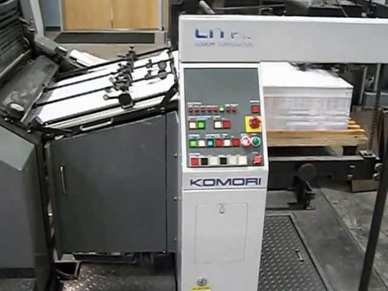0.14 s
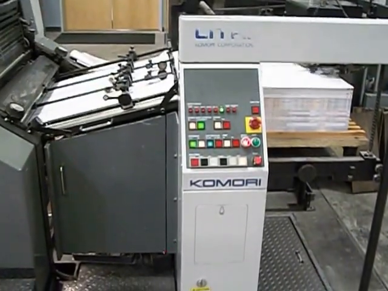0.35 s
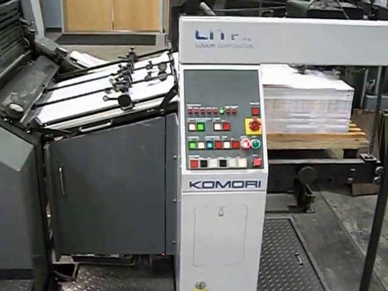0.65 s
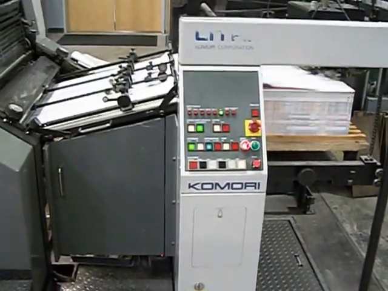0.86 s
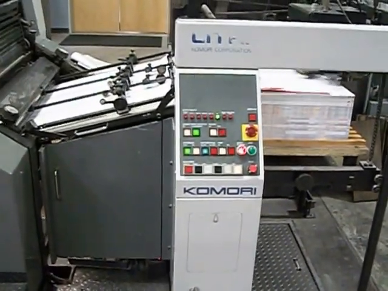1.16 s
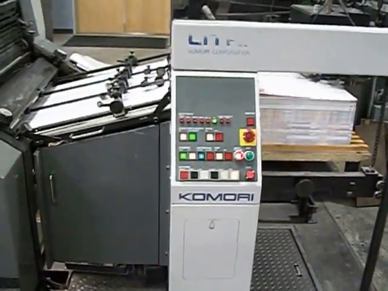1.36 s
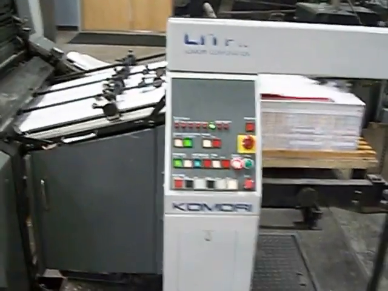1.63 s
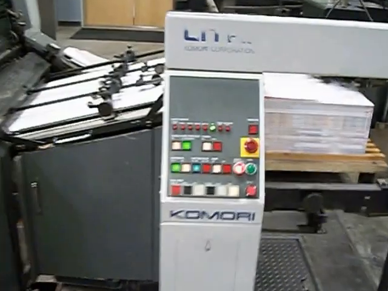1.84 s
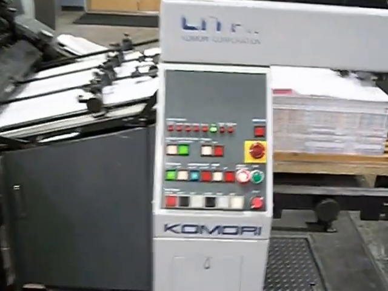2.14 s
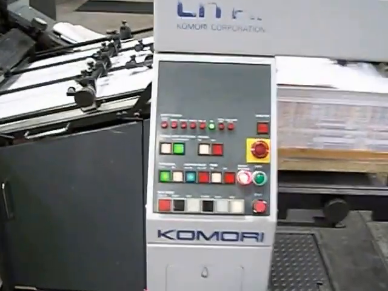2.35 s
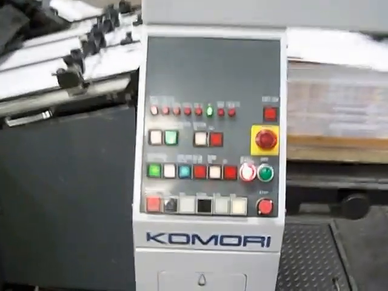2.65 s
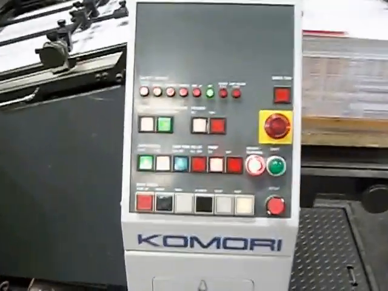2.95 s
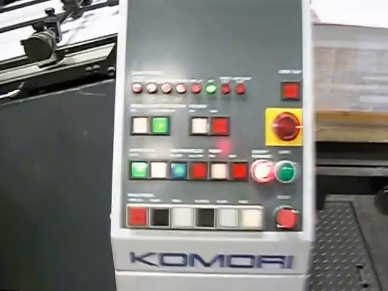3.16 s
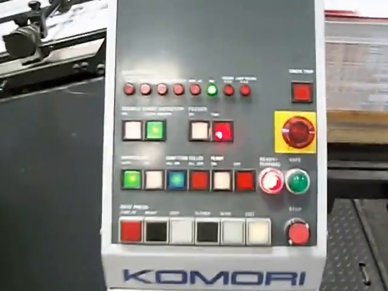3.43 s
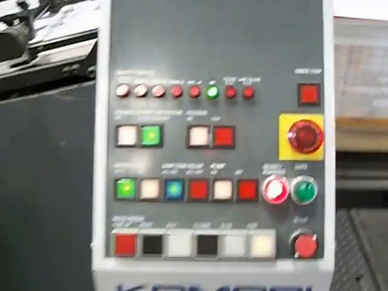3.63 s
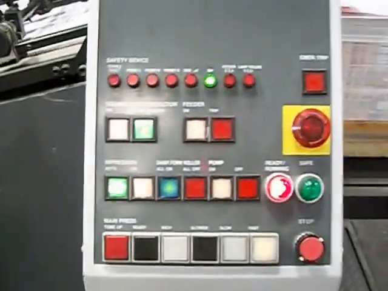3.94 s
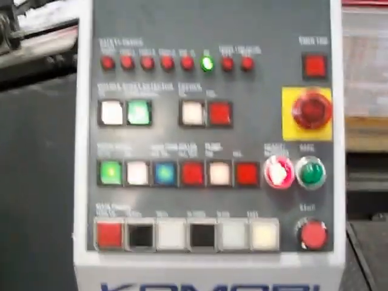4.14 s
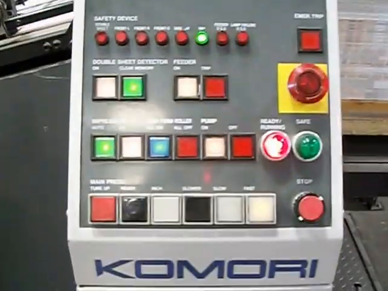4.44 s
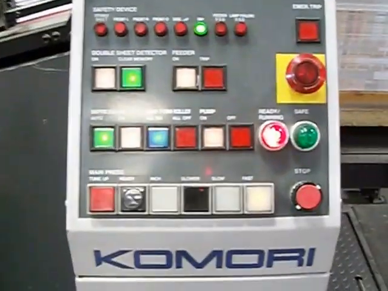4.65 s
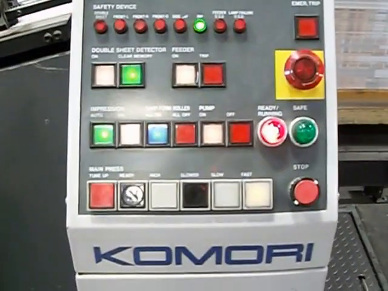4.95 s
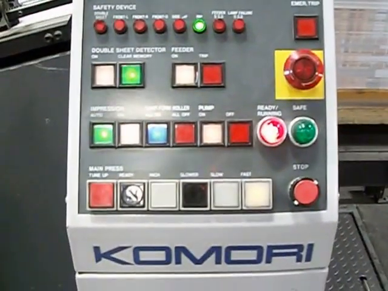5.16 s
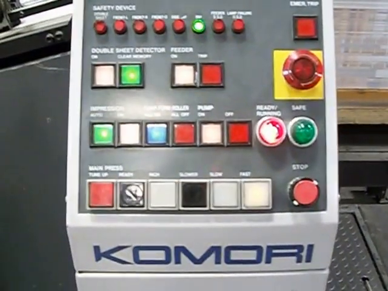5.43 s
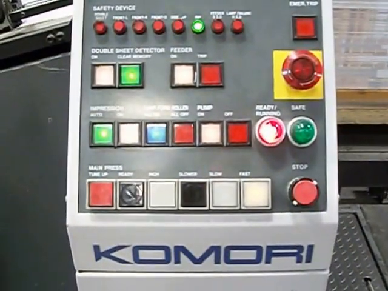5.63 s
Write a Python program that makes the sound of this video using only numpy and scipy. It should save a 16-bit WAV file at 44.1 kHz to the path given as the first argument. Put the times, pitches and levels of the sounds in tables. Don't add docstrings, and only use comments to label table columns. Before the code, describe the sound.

A sheet-fed printing press runs steadily with a low roar, thin motor whine, air hiss and rhythmic knocks and clacks.

```python
import sys
import numpy as np
from scipy import signal
from scipy.fft import rfft, irfft, next_fast_len
from scipy.io import wavfile
from scipy.ndimage import uniform_filter1d

SR = 44100
rng = np.random.default_rng(int(sys.argv[2]) if len(sys.argv) > 2 else 0)


def wav_record(signal):
    frames = np.transpose(np.atleast_2d(signal))
    bounded = np.clip(frames, -1, 1)
    quanta = np.round(bounded * 32767).astype(np.int16)
    wavfile.write(sys.argv[1], SR, quanta)


def boost(x):
    u = np.asarray(x, float) / 20
    return 10 ** u


N = 255339
TIME = np.arange(N) / SR

# [t/s, nearness 0-1]
WALK = [(0, .05), (.5, .25), (1.0, .1), (1.6, .05), (1.9, .4), (2.4, .3), (2.6, .7), (3.0, .65),
        (3.4, 1.05), (3.7, .95), (4.8, .8), (5.35, 1.1), (5.6, .85), (5.79, .9)]

SHAFT_HZ, MESH_HZ, IDLER_HZ = 58.21, 123.15, 619
SHAFT_DB, SHAFT_NEAR_DB, MESH_DB, MESH_NEAR_DB = -35.5, 2.2, -40, 8
BEAT_HZ, BEAT_PEAK_S, BEAT_DB = 1.53, .7, 1.6
SECOND_NEAR_DB, PUMP_NEAR_DB = 6.5, -8
FLUTTER_DB_PER_KHZ, FLUTTER_HZ = .6, 9
SWAY_RAD_PER_KHZ = .3
# [multiple, level/dB]
SHAFT_PARTIALS = [(2, -43), (4, -45), (5, -46), (42, -58.5), (56, -57), (76, 0), (96, -61)]
# [multiple, level/dB]
MESH_PARTIALS = [(8, -48), (22, -59)]
# [f/Hz, level/dB]
PUMPS = [(360, -45), (949.5, -50), (2766.7, -57), (5375.6, -54.5), (401, -50), (697, -50), (2650, -60),
         (2988, -60), (5169, -62)]
# [t/s, fan/dB, lower slot/dB, upper slot/dB]
NODES = [(0, -41, -52, -41), (.21, -35, -53, -42), (.62, -39, -52, -40), (.78, -40, -52, -47),
         (1.05, -40, -56, -45), (1.3, -43, -56, -59), (1.7, -47, -51, -48), (2.0, -46, -46.5, -50),
         (2.36, -40, -46, -53), (2.6, -50, -49, -47), (3.0, -50, -51, -50), (3.25, -41, -55, -49),
         (3.65, -46, -51, -50), (3.86, -47, -41.5, -51), (4.2, -52, -45, -50), (4.6, -48, -43.5, -49),
         (5.3, -49, -43, -50), (5.79, -46, -43, -51)]
# [t/s, gear whine/dB, middle slot/dB, top slot/dB, idler/dB]
SIDE_NODES = [(0, -46, -54, -60, -52), (.5, -51, -63, -58, -50), (1.3, -50, -60, -62, -47),
              (1.65, -53, -62, -60, -54), (1.95, -58, -52, -54, -50), (2.35, -50, -60, -50, -43),
              (2.6, -51, -57, -63, -49), (2.85, -60, -58, -58, -38), (3.15, -50, -54, -60, -40),
              (3.5, -51, -58, -52, -45), (3.9, -52, -51, -53, -51), (4.3, -52, -53, -51, -53),
              (4.65, -54, -54, -56, -48), (4.95, -54, -48, -56, -50), (5.79, -55, -53, -55, -54)]
# [t/s, level/dB]
TOP_SLOT = [(0, -63), (1.1, -59.5), (1.35, -50), (1.6, -58), (1.85, -47.5), (2.1, -51), (2.4, -55),
            (2.8, -52), (3.3, -55.5), (5.79, -58)]
HIGHEST_SLOT = 76

# [f/Hz, density/dB per Hz]
RUMBLE = [(25, -11), (42, -7.5), (72, -6), (98, -0.5), (420, 0.5), (600, -2), (750, -2.5), (950, -42.5)]
# [f/Hz, density/dB per Hz]
ROLLERS = [(550, -22.5), (750, -3.5), (870, -1.5), (1000, -1.5), (1120, -6.5), (1300, -11), (1500, -16),
           (1900, -41)]
# [f/Hz, density/dB per Hz]
CHAIN = [(1100, -9.5), (1450, -6), (1750, -0.5), (2600, -1), (3000, 0.4), (3500, -4), (3900, -6),
         (4500, -36)]
# [f/Hz, density/dB per Hz]
AIR = [(3400, -8.5), (3950, -4.5), (4300, -0.5), (4750, 1.5), (5100, 2.5), (5450, -8.5), (5900, -36.5)]
# [f/Hz, density/dB per Hz]
BLOWER = [(5150, -14), (5350, -2.5), (5620, 4.5), (5720, -6.5), (5790, -12), (6000, -8.5)]
RUMBLE_DB, ROLLER_DB, CHAIN_DB = (-29, 2, -1), (-34, 0.5, 0), (-42, .5, 1.5)
AIR_DB, BLOWER_DB = (-43.5, 0, 2), (-54.5, -0.2, 3)
BLOWER_FIRST_S, BLOWER_TURN_S = .47, .941
# [delay/s, width/s, swell/dB]
STROKES = [
    (0, .05, 7),
    (.345, .045, 4.5),
]

WHISTLE_DB, REED_DB = -51.5, -57
# [t/s, f/Hz]
WHISTLE = [(0, 5075), (.24, 5088), (.47, 5010), (.65, 5065), (.9, 5030), (1.3, 5090), (1.48, 5018),
           (1.65, 5025), (1.84, 5110), (2.0, 5030), (2.17, 5098), (2.4, 5030), (2.85, 5100), (2.98, 5005),
           (3.25, 5055), (3.42, 5015), (3.6, 5055), (3.95, 5090), (4.2, 5055), (4.43, 5005), (4.78, 5095),
           (5.0, 5030), (5.2, 5060), (5.33, 5025), (5.5, 5058), (5.68, 5030), (5.79, 5045)]
# [t/s, f/Hz]
REED = [(0, 5580), (.8, 5570), (.95, 5600), (1.25, 5595), (1.45, 5575), (1.9, 5600), (2.6, 5600),
        (2.95, 5570), (3.4, 5600), (3.7, 5610), (5.2, 5600), (5.79, 5575)]
# [centre t/s, half length/s, level over faint/dB]
SPELLS = [(.24, 0.17, 4.5), (.55, .04, 5), (1.31, 0.033, 7), (1.55, 0.068, 7), (1.8, .06, 4),
          (2.128, 0.048, 7), (2.54, 0.059, 4.5), (2.8, 0.064, 4), (3.07, .06, 8), (3.42, 0.025, 6),
          (3.58, 0.06, 9), (3.8, .06, 4), (4.041, 0.065, 7.5), (4.21, .04, 10), (4.47, .08, 7.5),
          (5.21, 0.051, 8.5), (5.46, .1, 6), (5.708, 0.077, 5)]
SPELL_EDGE_S = 0.0095

FIRST_SHEET_S, SHEET_S = .116, .4432
BUSY_AT_S, BUSY_S = 0.027, 0.052
# [delay/s, thud/dB, crack/dB, clack/dB, body/dB, tick/dB, puff/dB]
CAMS = [
    (0.0005, -0.5, -17.5, -19, -32, -25.5, -22.5),
    (0.017, 9, -9.5, 0, -0.5, -16, -14),
    (.0535, 11, 1, -6, -8, -20.5, 4.5),
    (0.128, 14, -5, 3.5, 8.5, -9.5, -18),
    (0.2509, -19.5, -16.5, -18.5, -14.5, 3.5, -3),
]
# [grippers/dB, side lay/dB, sucker lift/dB, stop/dB, sucker release/dB]
SHEETS = [(-11.5, -33.5, -32.5, -32, -44), (-21, -32, -38, -33.5, -53.5), (-13.5, -31.5, -31, -34.5, -36.5),
          (-19, -26.5, -36.5, -33, -38), (-17.5, -28.5, -35.5, -34.5, -33.5),
          (-13.5, -35.5, -30.5, -30.5, -25.5), (-20.5, -30.5, -31.5, -35.5, -37),
          (-8.5, -34.5, -33.5, -31.5, -38.5), (-8, -36.5, -32, -29.5, -27.5), (-20.5, -24, -28, -28.5, -38),
          (-13, -26.5, -29, -30, -29.5), (-13, -23, -30, -28.5, -35), (-12.5, -23.5, -29.5, -32, -36)]
# [t/s, thud/dB,
# clack/dB, tick/dB]
STRAYS = [(0.7727, -35, -30, -55), (1.8667, -34, -47, -47), (1.952, -40.5, -33, -34.5),
          (2.738, -40, -35.5, -40.5), (3.1958, -46.5, -43.5, -32), (3.3019, -41.5, -42.5, -33),
          (1.0052, -26, -42.5, -52.5), (3.562, -26.5, -46, -50.5), (3.5764, -46.5, -30.5, -39.5),
          (3.45, -39.5, -47, -32), (3.808, -41.5, -55, -34), (3.913, -29.5, -38, -53.5),
          (4.0783, -38, -28, -56.5), (4.3416, -33, -43, -30.5), (4.608, -12.5, -46.5, -56),
          (4.9724, -40, -32.5, -31), (5.305, -38, -40.5, -56), (5.3905, -40.5, -29.5, -46),
          (5.5095, -41, -45.5, -32.5), (1.0172, -38, -35, -34), (1.060, -50.5, -41.5, -39),
          (2.3249, -51, -42.5, -28.5), (3.135, -48, -47, -40.5), (4.1564, -47, -40.5, -31),
          (4.3553, -49.5, -43.5, -36), (5.0626, -44, -51.5, -31), (5.1214, -29.5, -25, -47.5),
          (5.4374, -48, -26.5, -38.5), (5.4895, -42, -49.5, -40), (1.8888, -28.5, -31.5, -57.5),
          (5.451, -39, -27, -32.5)]
STRAY_BODY_DB, STRAY_CRACK_DB, STRAY_PUFF_DB = -5, -18.5, -5
# [f/Hz, level/dB, t60/s]
KNOCK_MODES = [(473, -5, 0.12), (674, -3, 0.0081), (736, -14.5, 0.025), (940, 2, 0.018), (1270, -12.5, 0.1)]
CLACK_HZ, TICK_HZ, RING_SPREAD = 2950, 4620, .015
CRACK_T60_S, PUFF_T60_S, PUFF_RISE_S = .03, .07, .009
PLATE_HZ, PLATE_T60_S, PLATE_DB = 2655, 0.097, -8.5
# [t/s, level/dB, f/Hz]
TICKS = [(0.173, -32.5, 4840), (0.6125, -31, 4770), (1.0585, -32, 4790), (1.94, -35, 4430),
         (2.3314, -34.5, 3700), (2.7916, -34, 4500), (3.2191, -30.5, 5000), (3.3484, -31.5, 4820),
         (3.5768, -30.5, 3600), (3.8102, -34.5, 4650), (3.9125, -38, 4470), (4.1046, -32.5, 4600),
         (4.5491, -31.5, 4230), (4.6054, -31, 4570), (4.791, -32.5, 4830), (4.9931, -31.5, 4400),
         (5.0054, -30.5, 5010), (5.2324, -34.5, 4300), (5.436, -29.5, 4410), (5.4824, -31, 4520)]
# [t/s, level/dB, f/Hz]
BRIGHT_CLICKS = [(0.129, -37, 3380), (0.175, -35, 4620), (.243, -40, 3350), (1.131, -35.5, 3500),
                 (3.132, -33.5, 3680), (3.240, -33.5, 2726), (3.349, -35.5, 3400), (3.662, -33, 2880),
                 (3.787, -31.5, 3300), (3.912, -31.5, 3340), (4.156, -33, 4690), (4.231, -34, 3310),
                 (4.677, -37, 3330)]
TICK_GAIN_DB, TICK_T60_S, TICK_RISE_S = 11.5, 0.027, 0.0044
# [t/s, level/dB, f/Hz]
KNOCKS = [(1.0055, -12, 800), (1.0222, -16, 600), (2.208, -16, 600), (2.7395, -15, 600), (3.5625, -13, 800),
          (3.6617, -4, 780), (3.669, -14, 720), (4.117, -15, 600), (4.961, -15, 550)]
KNOCK_T60_S, KNOCK_RISE_S = .013, .0008
# [t/s, level/dB, f/Hz]
BOOMS = [(2.18, -17.5, 184), (2.83, -18, 192), (3.42, -16, 185), (4.10, -19.5, 200), (4.27, -21.5, 197.5),
         (4.32, -18, 205), (4.569, -19.5, 189.6), (4.781, -15.5, 191), (5.40, -19, 180), (5.48, -26, 175),
         (5.64, -18, 199)]
BOOM_T60_S, BOOM_RISE_S = 0.19, 0.028
HALL_T60_S, HALL_DB = .3, -10

MIC_RATE_HZ, LEFT_LAG_S = 12000, 1 / 12000
# [f/Hz, level/dB]
MIRROR = [(6000, 0), (6300, -5), (6600, -11.5), (7000, -20.5), (7500, -36), (7600, -43), (7700, -58),
          (7800, -120)]


def curves(table):
    s, *columns = np.transpose(table)
    return [np.interp(TIME, s, c) for c in columns]


def drift(rate_hz):
    k = int(SR / 64 / rate_hz)
    held = np.repeat(rng.standard_normal(N // 400)[:N // 64 // k + 2], k)
    coarse = uniform_filter1d(uniform_filter1d(held, k), k)
    return 1.44 * np.interp(TIME, np.arange(len(coarse)) * 64 / SR, coarse)


def bed(far_db, near_db, busy_db):
    since = (TIME - FIRST_SHEET_S - BUSY_AT_S + SHEET_S / 2) % SHEET_S - SHEET_S / 2
    return far_db + near_db * curves(WALK)[0] + busy_db * np.exp(-.5 * (since / BUSY_S) ** 2)


def tone(hz, db, wander_db, wobble):
    phase = 2 * np.pi * (np.cumsum(hz + 0 * TIME) / SR + rng.random())
    phase = phase + hz / 1000 * (wobble * drift(6) + SWAY_RAD_PER_KHZ * drift(1.5))
    wander = wander_db * drift(2.965)
    flutter = FLUTTER_DB_PER_KHZ * np.minimum(hz / 1000, 3) * np.minimum(drift(FLUTTER_HZ), .4)
    return np.sqrt(2) * boost(db + wander + flutter) * np.sin(phase)


def main_line(hz, db):
    return tone(hz, db + .3 + .3 * (hz > 2000), .6, .04)


def din(colour, flicker_db, rate_hz, grit_db):
    hz, db = np.transpose(colour)
    size = next_fast_len(N)
    f = np.log(np.arange(size // 2 + 1) * SR / size + 1e-9)
    gain = boost(np.interp(f, np.log(hz), db, left=-150, right=-150))
    grit = boost(grit_db * np.repeat(rng.exponential(size=size // 64 + 1), 64)[:size])
    spectrum = rfft(rng.standard_normal(size) * grit) * gain
    place = 3 * (f - np.log(hz[0])) / np.log(hz[-1] / hz[0])
    out = np.zeros(N)
    for k in range(4):
        band = irfft(spectrum * np.clip(1 - abs(place - k), 0, 1), size)[:N]
        out += band * boost(flicker_db * drift(rate_hz))
    return out / np.std(out)


def motor():
    fan_db, lower_db, upper_db = curves(NODES)
    _, middle_db, top_db, _ = curves(SIDE_NODES)
    beat_db = BEAT_DB * np.cos(2 * np.pi * BEAT_HZ * (TIME - BEAT_PEAK_S))
    shaft_db = bed(SHAFT_DB, SHAFT_NEAR_DB, 0) + beat_db
    levels = {1: shaft_db, 10: fan_db, 44: lower_db, 46: middle_db, 48: upper_db, 52: top_db}
    out = sum(main_line(k * SHAFT_HZ, db) for k, db in levels.items())
    for k, db in SHAFT_PARTIALS:
        if k == HIGHEST_SLOT:
            db = db + curves(TOP_SLOT)[0]
        if k == 2:
            db = db + SECOND_NEAR_DB * (curves(WALK)[0] - .7)
        out += tone(k * SHAFT_HZ, db, 1.5, .15)
    return out


def gears():
    whine_db, _, _, idler_db = curves(SIDE_NODES)
    out = main_line(6 * MESH_HZ, bed(MESH_DB, MESH_NEAR_DB, 0))
    out += main_line(21 * MESH_HZ, whine_db) + main_line(IDLER_HZ, idler_db)
    return out + sum(tone(k * MESH_HZ, db, 1.5, .15) for k, db in MESH_PARTIALS)


def pumps():
    fade_db = PUMP_NEAR_DB * (curves(WALK)[0] - .5)
    return sum(tone(hz, db + (hz < 400) * fade_db, 1.5, .15) for hz, db in PUMPS)


def rolling():
    out = boost(bed(*RUMBLE_DB) - 0.07) * din(RUMBLE, 0.47, 7.8, 0.96)
    out += boost(bed(*ROLLER_DB) + 0.44) * din(ROLLERS, 0.23, 24, 0.23)
    return out + boost(bed(*CHAIN_DB) + 3.0) * din(CHAIN, 0.18, 14, 0.53)


def sucker_air():
    return boost(bed(*AIR_DB) + 1.5) * din(AIR, 1.0, 26, 1.4)


def nozzle():
    lift_db = np.zeros(N)
    for s, half_s, db in SPELLS:
        edge = np.clip((abs(TIME - s) - half_s) / SPELL_EDGE_S, -30, 30)
        lift_db += db / (1 + np.exp(edge))
    out = tone(curves(WHISTLE)[0], WHISTLE_DB + lift_db, 1.5, .1)
    return out + tone(curves(REED)[0], REED_DB, 4, .2)


def blower():
    swell_db = np.zeros(N)
    for delay_s, width_s, db in STROKES:
        since = (TIME - BLOWER_FIRST_S - delay_s + BLOWER_TURN_S / 2) % BLOWER_TURN_S - BLOWER_TURN_S / 2
        swell_db += db * np.exp(-.5 * (since / width_s) ** 2)
    return boost(bed(*BLOWER_DB) + swell_db) * din(BLOWER, 1.2, 12, 1.5)


def add(out, s, sound):
    i = int(s * SR)
    out[i:i + len(sound)] += sound[:N - i]


def decay(t60_s, rise_s):
    t = TIME[:int(.15 * SR)]
    return t, (1 - np.exp(-t / rise_s)) * np.exp(-np.log(1000) * t / t60_s)


def ring(hz, t60_s, rise_s=0.00082):
    t, envelope = decay(t60_s, rise_s)
    return envelope * np.sin(2 * np.pi * hz * t)


def burst(lo_hz, hi_hz, t60_s, rise_s=0.0011):
    t, envelope = decay(t60_s, rise_s)
    x = signal.lfilter(*signal.butter(2, [lo_hz, hi_hz], "band", fs=SR), rng.standard_normal(len(t)))
    return x / np.std(x) * envelope


def strike(thud_db, crack_db, clack_db, body_db, tick_db, puff_db):
    spread = 1 + 0.074 * rng.standard_normal(len(KNOCK_MODES))
    frame = sum(boost(g) * ring(hz * j, t60, 0.00073) for (hz, g, t60), j in zip(KNOCK_MODES, spread))
    out = boost(thud_db - 11.0) * frame
    out += boost(thud_db - 3.5) * ring(760, 0.011, .0007)
    out += boost(thud_db - 15.5) * burst(290, 1100, 0.22)
    out += boost(crack_db + 2) * burst(2000, 5400, CRACK_T60_S, .001)
    clack_hz, tick_hz = np.array([CLACK_HZ, TICK_HZ]) * (1 + RING_SPREAD * rng.standard_normal(2))
    plate = boost(PLATE_DB) * ring(PLATE_HZ * np.sqrt(spread[-1]), PLATE_T60_S)
    clack = 1.3 * ring(clack_hz, 0.0075) + plate + 0.56 * burst(2700, 3600, CRACK_T60_S)
    out += boost(clack_db + 1.0) * clack
    out += boost(body_db - 2.0) * burst(1100, 2800, 0.028)
    snap = 1.5 * ring(tick_hz, .009, .002) + .1 * ring(1.02 * tick_hz, .03, .002)
    snap += .12 * burst(.88 * tick_hz, 1.12 * tick_hz, .03)
    out += boost(tick_db + 14.5) * snap
    return out + boost(puff_db + 6.5) * burst(4440, 5100, PUFF_T60_S, PUFF_RISE_S)


def sheet_cams():
    out = np.zeros(N)
    for k, strengths in enumerate(SHEETS):
        for db, (delay_s, *parts_db) in zip(strengths, CAMS):
            add(out, FIRST_SHEET_S + k * SHEET_S + delay_s, strike(*(db + np.array(parts_db))))
    return out


def clicks():
    out = np.zeros(N)
    for s, db, hz in [*TICKS, *BRIGHT_CLICKS]:
        pair = ring(hz, TICK_T60_S, TICK_RISE_S) + 0.37 * ring(1.05 * hz, TICK_T60_S, TICK_RISE_S)
        add(out, s, boost(db + TICK_GAIN_DB) * pair)
    return out


def loose_parts():
    out = np.zeros(N)
    for s, thud_db, clack_db, tick_db in STRAYS:
        crack_db, body_db = thud_db + STRAY_CRACK_DB, clack_db + STRAY_BODY_DB
        add(out, s, strike(thud_db, crack_db, clack_db, body_db, tick_db, tick_db + STRAY_PUFF_DB))
    for s, db, hz in KNOCKS:
        add(out, s, boost(db) * ring(hz, KNOCK_T60_S, KNOCK_RISE_S))
    return out


def floor_plate():
    out = np.zeros(N)
    for s, db, hz in BOOMS:
        add(out, s, boost(db) * ring(hz, BOOM_T60_S, BOOM_RISE_S))
    return out


def in_hall(blows):
    t = TIME[:int(.6 * SR)]
    tail = rng.standard_normal(len(t)) * 1000. ** (-t / HALL_T60_S) * (t > .008)
    tail /= np.sqrt(np.sum(tail ** 2))
    out = blows + boost(HALL_DB) * signal.fftconvolve(blows, tail)[:N]
    return signal.sosfilt(signal.butter(5, 5500, fs=SR, output="sos"), out)


def scene():
    steady = motor() + gears() + pumps() + rolling() + sucker_air() + nozzle() + blower()
    blows = sheet_cams() + clicks() + loose_parts() + floor_plate()
    return np.tile(steady + in_hall(blows), (2, 1))


def band_limit(x):
    return signal.sosfilt(signal.butter(12, 7650, fs=SR, output="sos"), x)


def record(dry):
    size = next_fast_len(N + 1024)
    f = np.arange(size // 2 + 1) * SR / size
    half = round(MIC_RATE_HZ / 2 * size / SR)
    spectrum = rfft(np.pad(dry[0], 512, "reflect"), size) * (f < MIC_RATE_HZ / 2)
    mirror_gain = boost(np.interp(f[half:2 * half], *np.transpose(MIRROR)))
    spectrum[half:2 * half] = np.conj(spectrum[half:0:-1]) * mirror_gain
    late = np.exp(-2j * np.pi * f * LEFT_LAG_S)
    mix = np.array([irfft(spectrum * late, size), irfft(spectrum, size)])[:, 512:512 + N]
    return band_limit(mix)


dry = scene()
out = record(dry)
wav_record(out)
```